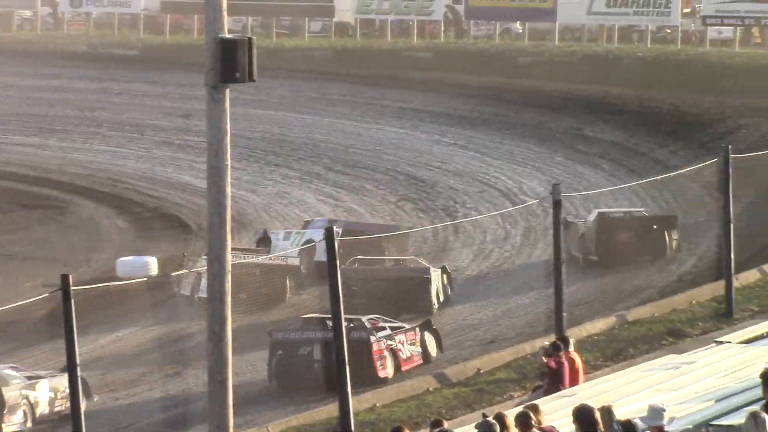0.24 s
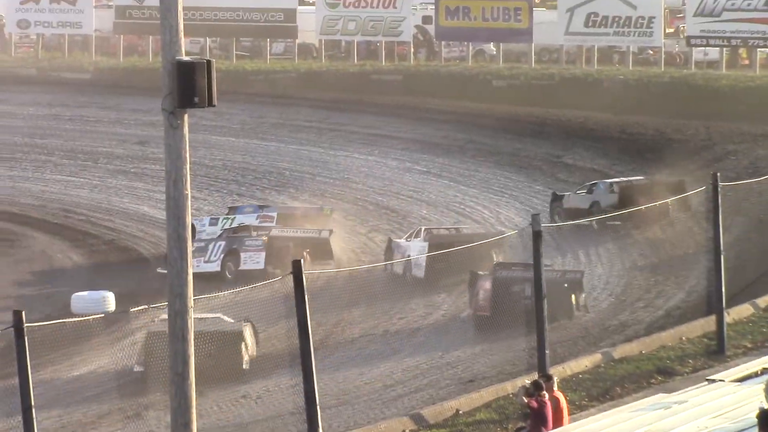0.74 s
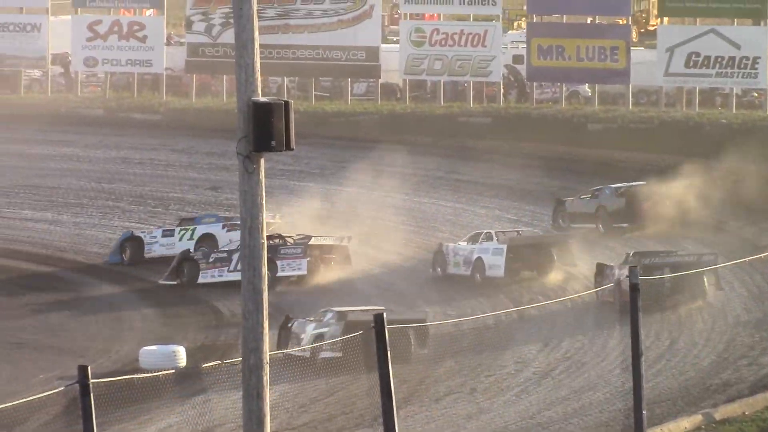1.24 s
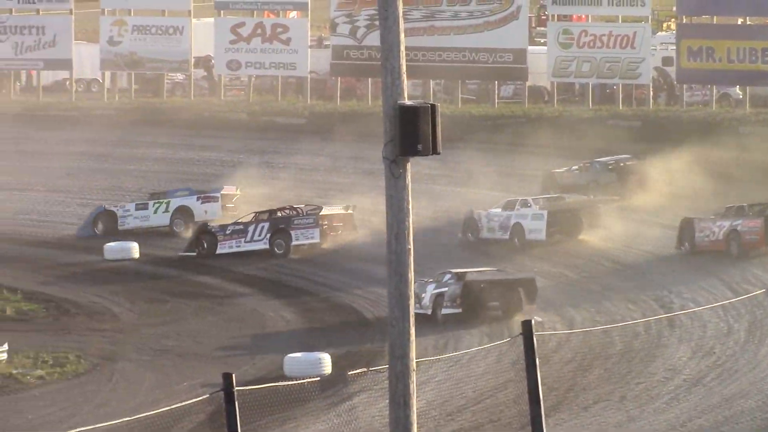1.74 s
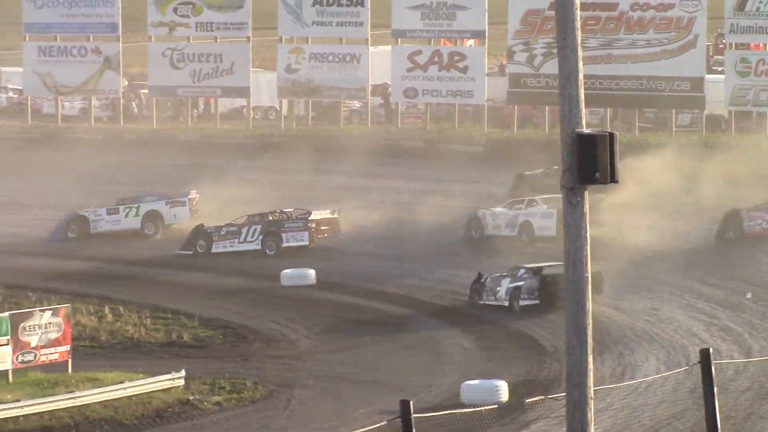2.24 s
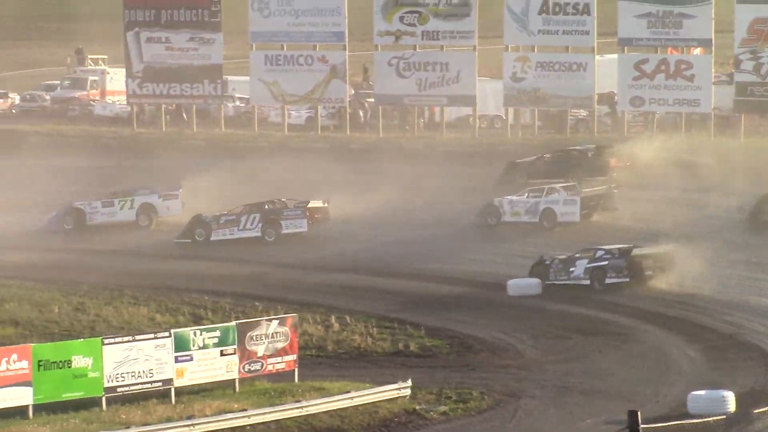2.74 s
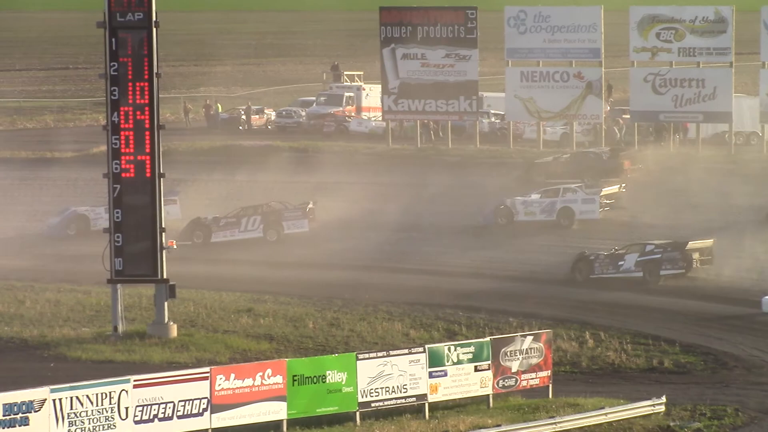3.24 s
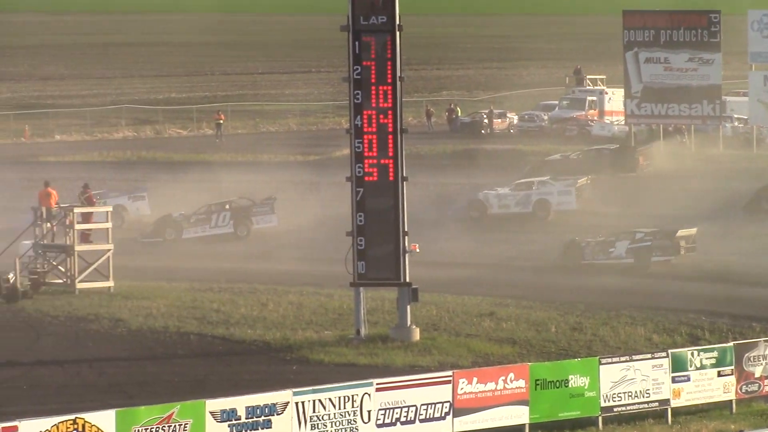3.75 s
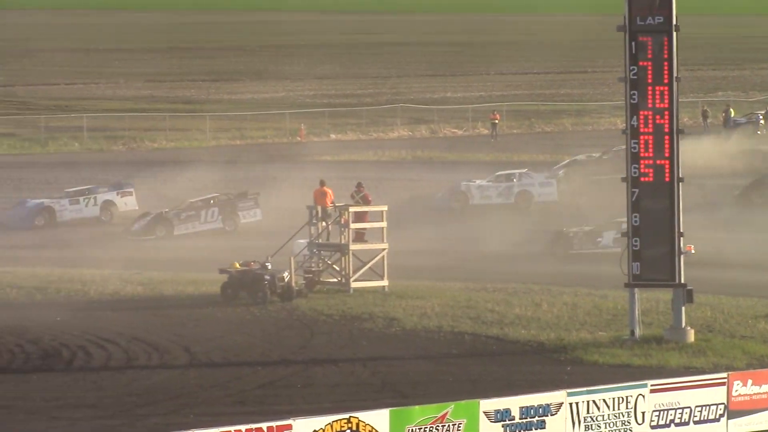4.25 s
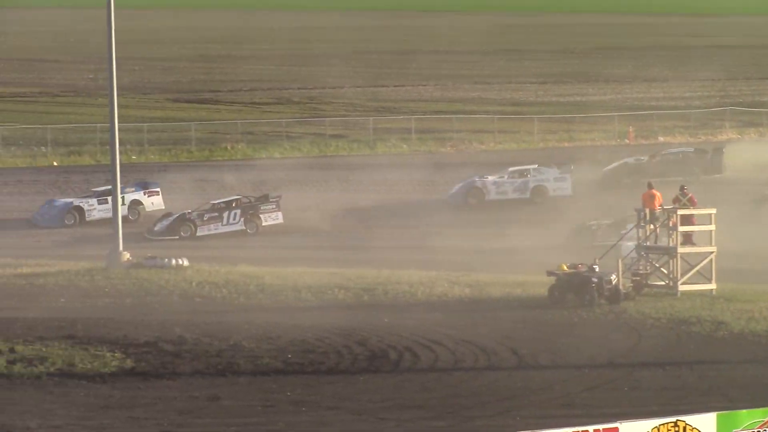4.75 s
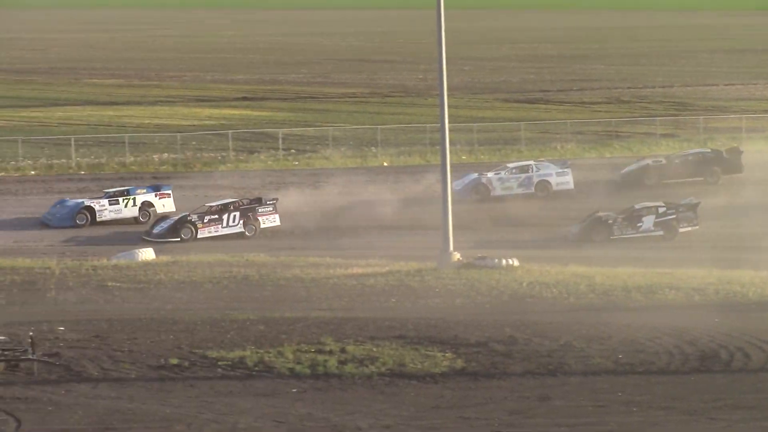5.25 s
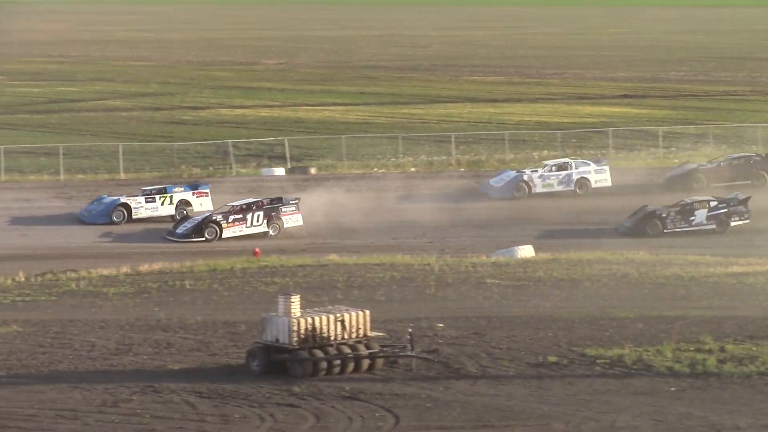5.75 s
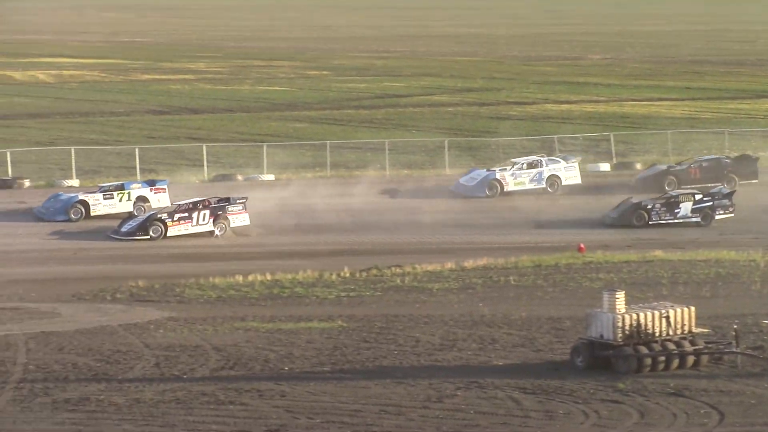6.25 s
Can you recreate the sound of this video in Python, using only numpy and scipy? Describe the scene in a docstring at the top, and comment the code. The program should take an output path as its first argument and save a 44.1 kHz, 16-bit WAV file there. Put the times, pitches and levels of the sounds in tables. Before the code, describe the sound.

An outdoor dirt oval heard from the grandstand through a thin, midrange-heavy stereo microphone. At 0 s several V8 race cars with open exhausts make a fairly distant, raspy roar, mixed with the grainy hiss of tyres throwing dirt. Around 1 s the engines surge with a brief hard rattle, then the level drops, lowest near 1.6 s, while the hiss thins out. From 2 to 3.8 s the roar returns at a steady, modest level; exhaust notes rise out of it near 2.6 s over a low wavering hum. From about 4 s it swells, with sharp barks near 4.0 and 4.3 s and more low-end weight, dips slightly at 4.6 s, then climbs again through 5 s. By 6 s the pack is loudest, fuller and throaty, smeared by echo from the stands, slightly crackling, and still roaring at the 6.5 s end.

```python
"""A field of V8 dirt-track cars races round an outdoor oval, heard from the grandstand.
Open headers bark eight times a cycle; stands and fences smear the barks into a roar, with single notes gliding out.
The leaders slide through the turn throwing dirt, a grainy hiss, and pull away; then the pack comes up the straight.
A thin-sounding stereo microphone colours it all, limits the highest peaks and crackles when the level runs high."""
import sys
import numpy as np
from scipy import signal
from scipy.fft import rfft, irfft
from scipy.io import wavfile
from scipy.ndimage import uniform_filter1d, minimum_filter1d

SR = 44100
rng = np.random.default_rng(int(sys.argv[2]) if len(sys.argv) > 2 else 0)


def generate_wav(sig):
    """Save sig (samples, or channels by samples) to the path in sys.argv[1] as 16-bit PCM at SR."""
    pcm = np.round(np.clip(np.atleast_2d(sig).T, -1, 1) * 32767).astype(np.int16)
    wavfile.write(sys.argv[1], SR, pcm)


N = 286650
T = np.arange(N) / SR

# each near car coasts into the turn, climbs to its top revs and stands out while its headers face the stand
# [throttle opens t/s, climb/s, revs at opening/rpm, top revs/rpm, stands out t/s, peak prominence/dB]
CARS = [(1.75, 1.4, 6400, 7380, 2.52, 4), (.55, .55, 4500, 6000, 0.96, 7), (1.9, 2.0, 5300, 6420, 4.32, 4),
        (4.6, 2.0, 7200, 8250, 6.2, 5.5), (2.8, 4.6, 4400, 7400, 6.4, 7.5),
        (6.2, 1.4, 4880, 6500, 6.92, 6.5)]
# header bank of the eight firings in a cycle [1 = near bank, 0 = far bank]
FIRING_BANK = np.array([1, 0, 1, 1, 0, 1, 0, 0])
# swell of the whole pack with its distance, before surges and trim [t/s, level/dB]
PACK_LEVEL = [(0, -34), (.38, -38.5), (.95, -30.5), (1.21, -34), (1.27, -35), (1.51, -34.5), (1.58, -40),
              (1.72, -39.5), (2.17, -35), (2.55, -36), (2.72, -35), (3.8, -34), (3.99, -32), (4.13, -27),
              (4.33, -25), (4.45, -26.5), (4.58, -27.5), (4.75, -24), (5.17, -22.5), (5.48, -18.5),
              (5.55, -19.5), (6.08, -14), (6.19, -15.5), (6.28, -14.5), (6.5, -15)]
# spectrum of the exhaust roar [f/Hz, level/dB]
EXHAUST_SPECTRUM = [(40, -62), (110, -56), (165, -48.5), (235, -28.5), (300, -20), (480, -24.5), (580, -13),
                    (750, -7), (1050, -4.5), (1350, 0.5), (2000, 0.87), (2800, -1.04), (3900, -7.5),
                    (5200, -19), (6800, -27.5), (9000, -42), (11500, -64), (14000, -95)]
# brief flares and dips of one band of the roar [t/s, spread/s, centre f/Hz, change/dB]
FLARES = [(0.552, 0.071, 3570, 1.5), (.8, .03, 1700, 2.5), (1.1, 0.08, 3310, 2), (1.42, .007, 820, 4),
          (1.518, 0.0079, 2290, 2.5), (1.884, .009, 1490, 7.5), (1.916, 0.057, 3930, 2.5),
          (2.9, 0.11, 4040, 3), (4.167, 0.064, 4200, 3), (5.696, .045, 5240, 4.5), (6.05, .035, 4200, 2),
          (4.636, 0.0049, 5960, 13.5), (5.76, 0.0035, 2500, 10), (5.3, .2, 4700, -2),
          (6.296, 0.0081, 985, 2.5), (6.305, 0.16, 1360, 2), (6.3, .15, 560, 2)]
# surges as a tailpipe swings past the stand [t/s, spread/s, level change/dB, body change/dB]
SURGES = [(0.791, 0.026, 2, -1), (0.873, .025, -1.5, 2), (1.005, 0.052, 0.5, 3), (1.169, 0.049, 3, 3),
          (1.33, 0.09, 0.5, 1), (2.866, 0.24, 0.8, -1), (3.55, 0.1, 1, -3), (4.196, 0.057, 0.5, -2),
          (4.306, 0.056, 3, -4), (5.017, 0.054, 3, -6), (5.41, 0.066, 1, -1), (5.707, 0.034, 2.5, -6.5),
          (6.06, 0.027, 2, -1.5)]
# exhaust notes that rise out of the roar [t/s, length/s, from f/Hz, to f/Hz, level/dB]
NOTES = [(.68, .2, 335, 374, -19), (.86, .2, 765, 800, -22.5), (.94, .19, 390, 418, -17.5),
         (1.04, .14, 320, 358, -17.5), (1.12, .19, 783, 806, -26), (2.52, .22, 380, 416, -18),
         (2.74, .2, 416, 408, -18), (2.55, .3, 888, 945, -21.5), (2.85, .22, 955, 986, -19.5),
         (2.6, .24, 796, 820, -25), (3.03, .17, 812, 799, -21), (3.45, .2, 1127, 1118, -23),
         (3.45, .35, 366, 360, -19), (3.3, 1.0, 336, 328, -21), (3.93, .38, 764, 808, -22.5),
         (3.94, .15, 963, 976, -24), (4.42, .2, 686, 694, -23.5), (4.55, .25, 642, 612, -21.5),
         (4.68, .25, 1009, 1023, -23.5), (4.92, .26, 360, 366, -20), (5.3, .24, 580, 564, -21),
         (5.48, .16, 420, 413, -20), (5.8, .25, 1065, 1110, -26), (5.95, .25, 738, 758, -25),
         (6.21, .23, 1152, 1156, -25), (6.25, .21, 945, 939, -24), (3.3, 1.0, 106, 111, -15.5),
         (4.85, 1.05, 148, 163, -27), (5.4, 1.0, 174, 198, -26.5)]
# low hum of the leaders' exhausts, before its trim [t/s, f/Hz, level/dB]
HUM = [(.85, 302, -35), (1.0, 303, -17), (1.38, 301, -17.5), (1.55, 277, -18), (1.85, 287, -16.5),
       (2.1, 276, -17.5), (2.5, 279, -22), (2.72, 306, -17), (2.92, 310, -17), (3.15, 304, -18),
       (3.4, 316, -17), (3.68, 296, -18), (3.9, 296, -19), (4.12, 306, -20), (4.55, 300, -22),
       (4.9, 316, -17.5), (5.25, 315, -32)]
# headers pointing straight at the stand, firings sharper, before the pack is levelled
# [t/s, spread/s, revs/rpm, level/dB]
BARKS = [(.76, .05, 5400, -3), (1.08, .09, 6000, -3), (2.2, .11, 6600, -3), (2.66, .05, 6600, -2),
         (3.96, .055, 7500, 2), (4.3, .05, 7560, 2), (4.62, .04, 6000, -1), (5.02, .06, 7300, -3),
         (5.46, .05, 6100, -2), (5.72, .045, 7600, -1), (6.06, .04, 7900, -2)]
# tyres throwing dirt, fading as the leaders leave the near turn [t/s, level/dB]
SPRAY_LEVEL = [(0, -36.5), (1.15, -40.5), (1.7, -50.5), (6.5, -57)]
# single slides that fling more dirt [t/s, spread/s, boost/dB]
SLIDES = [(1.46, 0.067, 3), (2.23, 0.046, 5.5), (2.9, 0.12, 4.5), (4.15, .08, 7)]
# spectrum of the flying dirt [f/Hz, level/dB]
DIRT_SPECTRUM = [(40, -30), (2000, 8.5), (4400, 4), (6800, 0), (8200, -6), (10000, -16), (12000, -30.5),
                 (15000, -54)]
# stereo width: side against mid [f/Hz, level/dB]
WIDTH = [(500, -69.5), (1000, -70), (1400, -52), (2600, -24.5), (4000, -18.5), (5200, -11), (6300, -8.5),
         (8000, -11), (11000, -5.5)]
# microphone peaks and dips, changing as it turns with the cars [f/Hz, width/Hz, start level/dB, end level/dB]
MIC_RIPPLES = [(793, 55, 3, -0.5), (1086, 61, -4, -3.5), (1430, 110, 1, 0.5), (1610, 71, -1, -2.5),
               (1874, 90, 0, 0.5), (2526, 88, -4, 0.5), (2760, 91, 1.5, 1), (3080, 70, -2.5, -0.5),
               (3280, 90, 2.5, .5), (3690, 87, 1, -3), (4180, 91, 1, 0), (4450, 100, -3, -5.5),
               (5120, 136, -6.5, -6.5), (5700, 110, -5, -4.5), (6000, 130, 1.5, 2)]
# how far those peaks and dips slide [t/s, share of their frequency]
MIC_SLIDE = [(0, 0.028), (.9, -0.0031), (2.6, -0.015), (4.3, -0.039), (6.5, 0.0053)]
# microphone gain in the bass [t/s, level/dB]
BASS = [(0, -20.5), (1, -20), (2.5, -15.5), (2.75, -12), (3.23, -10), (3.31, 1.5), (3.75, -1), (3.88, 8.5),
        (4.29, 0), (4.35, -17), (4.74, -14), (4.8, -3), (5.1, 4), (6.5, 4)]
# microphone gain of the low-mid hump [t/s, level/dB]
LOW_MID = [(0, -10.5), (3.25, -2), (3.33, -17), (3.75, -16), (3.83, 1), (4.3, -2.5), (4.37, -6.5),
           (4.75, -1), (4.82, -14), (5.24, -14), (5.34, 3), (6.5, 2.5)]

COAST_RPM_PER_S, EASE_RPM_PER_S = 380, 330  # revs lost off the throttle, and after the top of the climb
GRIP_SPREAD = .02  # share by which the revs swing as the tyres grip and slip
FACING_S = 0.42  # time either side of the peak at which half the prominence is lost
BODY_DB, RASP_DB = 1.5, 0.97  # body and rasp humps before surges and arrival
RASP_PER_DB = 0.4  # rise of the rasp per dB of surge
# the pack draws level with the stand and sounds fuller
ARRIVAL_S, ARRIVAL_RISE_S, ARRIVAL_BODY_DB, ARRIVAL_RASP_DB = 5.51, 0.99, 9.5, 0.1
NOTE_FADE_S, NOTE_ROUGH_DB, HUM_WAVER = .09, 2.5, .016
TOP_HZ = 15100  # microphone's upper limit


def undb(db):
    """Decibels to gain."""
    return 10 ** (np.asarray(db) / 20)


def unit(x):
    """Scale to rms 1."""
    return x / np.sqrt(np.mean(x ** 2))


def curves(rows, t=T):
    """The columns of a table, joined by straight lines in time."""
    s, *columns = np.transpose(rows)
    return [np.interp(t, s, c) for c in columns]


def spectrum(points, f):
    """Level in dB at frequencies f, joined on a log axis."""
    hz, db = np.transpose(points)
    return np.interp(np.log(f + 1), np.log(hz), db)


def bell(x, centre, width):
    """A smooth hump of height 1, in time or frequency."""
    return np.exp(-.5 * ((x - centre) / width) ** 2)


def swells(rows, t=T):
    """The sum of humps given as rows of (t/s, spread/s, height)."""
    return sum(height * bell(t, s, length) for s, length, height in rows)


def ramp(t, start, length):
    """A smooth rise from 0 to 1."""
    return np.sin(np.pi / 2 * np.clip((t - start) / length, 0, 1)) ** 2


def walk(rate):
    """Random wander with a spread near 1, heading for a new value `rate` times a second."""
    k = int(SR / rate)
    steps = np.repeat(rng.standard_normal(N // k + 2), k)
    return 1.2 * uniform_filter1d(steps, k)[rng.integers(k):][:N]


def colour(x, db_at):
    """Filter by a gain in dB that depends on frequency and may move in time."""
    f, t, z = signal.stft(x, SR, nperseg=1536, noverlap=1152)
    z = z * undb(db_at(f[:, None], t))
    return signal.istft(z, SR, nperseg=1536, noverlap=1152)[1][..., :N]


def drive(opens_s, climb_s, low_rpm, top_rpm, facing_s, peak_db, away_db=-10):
    """One car's revs and prominence: it coasts, opens up, and is loudest while its headers face the stand."""
    coasting = COAST_RPM_PER_S * np.maximum(opens_s - T, 0)
    climb = (top_rpm - low_rpm) * ramp(T, opens_s, climb_s)
    eased = EASE_RPM_PER_S * np.maximum(T - opens_s - climb_s, 0)
    rpm = (low_rpm + coasting + climb - eased) * (1 + GRIP_SPREAD * walk(3))
    facing = 1 / (1 + ((T - facing_s) / FACING_S) ** 2)
    return rpm, peak_db + away_db * (1 - facing)


def disperse(x, t60, size=2048):
    """Spread each shock in time, as pipe bends and bodywork do, without colouring it."""
    response = rfft(rng.standard_normal(size) * np.exp(-np.log(1000) * T[:size] / t60))
    phase_only = irfft(response / np.abs(response))
    return signal.oaconvolve(x, phase_only)[:N]


def engine(rpm, far_bank_db=-6, far_lag_s=0.000499, cylinder_db=2, scatter_db=3, jitter_s=.00012,
           hunt=.009, gas_db=-5, puff=0.27, pipe_t60=.011):
    """A cross-plane V8: each firing sends a shock and a puff of gas through two unevenly heard headers."""
    # eight firings in two turns; wheelspin on the ruts makes the revs hunt
    firings = np.cumsum(rpm * (1 + hunt * walk(11))) * 4 / 60 / SR + 8 * rng.random()
    k = np.arange(int(firings[0]) + 1, int(firings[-1]))
    cylinder = k % len(FIRING_BANK)
    far = 1 - FIRING_BANK[cylinder]
    chance = rng.standard_normal((N // 20, 2))[k]
    uneven_db = cylinder_db * rng.standard_normal(len(FIRING_BANK))[cylinder]
    size = undb(far * far_bank_db + uneven_db + scatter_db * chance[:, 0])
    fire_s = np.interp(k, firings, T) + far * far_lag_s + jitter_s * chance[:, 1]
    at = np.clip(fire_s * SR, 0, N - 2)
    # share each shock between the two samples it falls between
    i = at.astype(int)
    shocks = np.bincount(i, size * (1 - at + i), N) + np.bincount(i + 1, size * (at - i), N)
    puffs = np.exp(-(firings % 1) / puff) * np.interp(firings, k, size)
    gas = rng.standard_normal(N) * puffs
    return disperse(unit(shocks - shocks.mean()) + undb(gas_db) * unit(gas), pipe_t60)


def over_track(x, bounce=0.48, lag_s=0.00159, sway=0.335, flutter_db=0.63):
    """Direct sound plus its bounce off the dirt; motion and gusty air shift the two and shake the level."""
    lag = lag_s * (1 + sway * walk(3))
    return unit(x + bounce * np.interp(T - lag, T, x)) * undb(flutter_db * walk(18))


def far_field(count=3, rpm=6200, rev_spread=.12, smear_t60=0.034):
    """Cars elsewhere on the lap, blurred by distance, each on and off the throttle in its own time."""
    cars = sum(engine(rpm * np.exp(rev_spread * walk(.7))) for _ in range(count))
    return unit(disperse(cars, smear_t60))


def stands_echo(x, t60, count=8, drift_rate=4):
    """Dense reflections dying in t60 seconds; as a car moves, one set of paths gives way to another."""
    t = T[:int(t60 * SR) + 2]
    responses = rng.standard_normal((count, N))[:, :len(t)] * np.exp(-np.log(1000) * t / t60)
    responses /= np.linalg.norm(responses, axis=1, keepdims=True)
    shares = np.array([walk(drift_rate) for _ in range(count)])
    shares /= np.linalg.norm(shares, axis=0)
    echoes = signal.fftconvolve(x[None], responses, axes=1)[:, :N]
    return np.sum(shares * echoes, axis=0)


def exhaust_db(f, t, body_hz=660, body_width_hz=270, rasp_hz=3200, rasp_width_hz=900, swell_db=0.66):
    """The headers' body and rasp; bands swell apart at random, brief flares and dips are set by time and pitch."""
    surge_db, surge_body_db = surges(t)
    arrived = ramp(t, ARRIVAL_S, ARRIVAL_RISE_S)
    body_db = BODY_DB + surge_body_db + ARRIVAL_BODY_DB * arrived
    rasp_db = RASP_DB + RASP_PER_DB * surge_db + ARRIVAL_RASP_DB * arrived
    humps = body_db * bell(f, body_hz, body_width_hz) + rasp_db * bell(f, rasp_hz, rasp_width_hz)
    band_swells = sum(np.interp(t, T, walk(22)) * bell(f, hz, hz / 4) for hz in (1400, 2300, 3700))
    flares = sum(db * bell(t, s, length) * bell(f, hz, hz / 4) for s, length, hz, db in FLARES)
    return spectrum(EXHAUST_SPECTRUM, f) + humps + swell_db * band_swells + flares


def spray(grain_db=1.0):
    """Sliding tyres fling grit: a grainy noise hiss, fading after the near turn, as mid and side."""
    grit = rng.standard_normal((2, N)) * undb(grain_db * walk(300))
    dirt = unit(colour(grit, lambda f, t: spectrum(DIRT_SPECTRUM, f)))
    mid, side = dirt * undb(curves(SPRAY_LEVEL)[0] + swells(SLIDES))
    return np.array([mid, colour(side, lambda f, t: spectrum(WIDTH, f))])


def tone(hz, waver=.007, waver_db=2.5):
    """One wavering overtone of an exhaust, roughened by uneven firings."""
    swell_db = waver_db * walk(13) + NOTE_ROUGH_DB * walk(80)
    phase = 2 * np.pi * np.cumsum(hz * (1 + waver * walk(14))) / SR
    return unit(np.sin(phase) * undb(swell_db))


def exhaust_hum(trim_db=-2):
    """A low hum that bends with the revs: two cars beating at nearly the same pitch."""
    hz, db = curves(HUM)
    return unit(tone(hz, HUM_WAVER) + tone(hz, HUM_WAVER)) * undb(db + trim_db)


def engine_notes():
    """Single exhaust overtones glide out of the roar and sink back."""
    out = np.zeros(N)
    t = T + NOTE_FADE_S / 2  # centres each fade on the note's start or end
    for start, length, from_hz, to_hz, note_db in NOTES:
        end = start + length
        fade = ramp(t, start, NOTE_FADE_S) - ramp(t, end, NOTE_FADE_S)
        out = out + tone(np.interp(T, [start, end], [from_hz, to_hz])) * fade * undb(note_db)
    return out


def barks(gas_db=-8, pipe_t60=0.0063):
    """Short stretches of hard, close-sounding exhaust rattle: steadier firings, less gas, less pipe smear."""
    out = np.zeros(N)
    for s, length, rpm, db in BARKS:
        rattle = engine(rpm, scatter_db=1.5, hunt=.005, gas_db=gas_db, pipe_t60=pipe_t60)
        out = out + rattle * bell(T, s, length) * undb(db)
    return out


def surges(t=T):
    """Level and body changes in dB as tailpipes swing past the stand."""
    level_db = swells([(s, length, db) for s, length, db, _ in SURGES], t)
    body_db = swells([(s, length, db) for s, length, _, db in SURGES], t)
    return level_db, body_db


def pack(stands_db=-4, stands_t60=1.0, far_field_db=-5, even_s=.06):
    """Near engines, the field across the oval and the echo from the stands, as mid and side."""
    near, power = 0, 0
    for car in CARS:
        rpm, db = drive(*car)
        near = near + undb(db) * over_track(engine(rpm))
        power = power + undb(db) ** 2
    direct = near / np.sqrt(power) + undb(far_field_db) * far_field()
    mid = direct + undb(stands_db) * stands_echo(direct, stands_t60) + barks()
    # the cars trade places within one overall level
    level = np.sqrt(uniform_filter1d(mid ** 2, int(even_s * SR) + 1))
    mid = mid / level + exhaust_hum() + engine_notes()
    # only sound scattered in from the sides differs between the close-set capsules
    side = colour(unit(stands_echo(direct, stands_t60)), lambda f, t: spectrum(WIDTH, f))
    return np.array([mid, side])


def scene(roar_db=0.56):
    """The pack swells and fades over the hiss of the dirt, as left and right."""
    cars = colour(pack(), exhaust_db)
    level_db = curves(PACK_LEVEL)[0] + surges()[0] + roar_db
    mid, side = cars / np.std(cars[0]) * undb(level_db) + spray()
    return np.array([mid + side, mid - side])


def microphone_db(f, t, bass_edge_hz=410, low_mid_hz=490, low_mid_width_hz=60):
    """Ripples that slide as the microphone turns, and a low end that comes and goes."""
    slide, turned = 1 + curves(MIC_SLIDE, t)[0], t / T[-1]
    ripples = sum((first_db + (last_db - first_db) * turned) * bell(f, hz * slide, width)
                  for hz, width, first_db, last_db in MIC_RIPPLES)
    bass = curves(BASS, t)[0] / (1 + (f / bass_edge_hz) ** 12)
    low_mid = curves(LOW_MID, t)[0] * bell(f, low_mid_hz, low_mid_width_hz)
    return ripples + bass + low_mid


def overload(x, ceiling=0.69, onset_db=-15.5, crackle_db=-47, grain_db=3, sense_s=.03, size=96):
    """A limiter ducks the highest peaks, and noise crackles on the signal once its level passes the onset."""
    gain = np.minimum(1, ceiling / (np.abs(x).max(axis=0) + 1e-9))
    gain = uniform_filter1d(minimum_filter1d(gain, size), size)  # size in samples
    strength = np.sqrt(np.abs(uniform_filter1d(x[0] ** 2, int(sense_s * SR) + 1)))
    excess = np.maximum(strength / undb(onset_db) - 1, 0)
    crackle = unit(rng.standard_normal((2, N)) * undb(grain_db * walk(600)))
    return x * gain * (1 + undb(crackle_db) * excess * crackle)


def record(dry):
    """The microphone colours the sum of its two capsules, overloads when loud and cuts the top."""
    left, right = dry
    mid = colour((left + right) / 2, microphone_db)
    side = (left - right) / 2
    loud = overload(np.array([mid + side, mid - side]))
    top_cut = signal.ellip(8, .2, 70, TOP_HZ, fs=SR, output="sos")
    return signal.sosfilt(top_cut, loud)


dry = scene()
out = record(dry)
generate_wav(out)
```